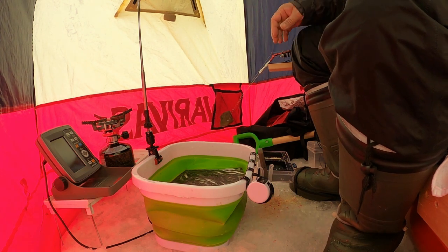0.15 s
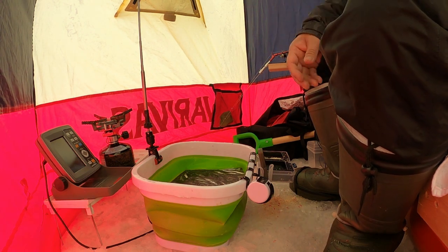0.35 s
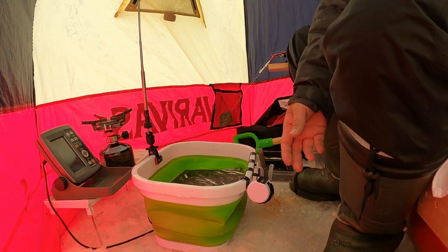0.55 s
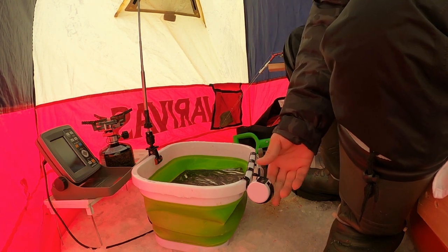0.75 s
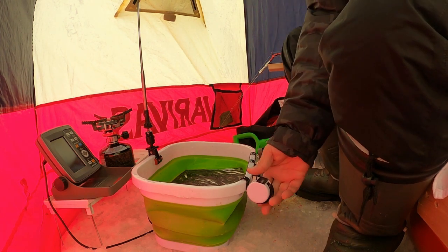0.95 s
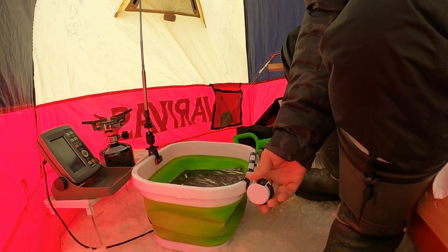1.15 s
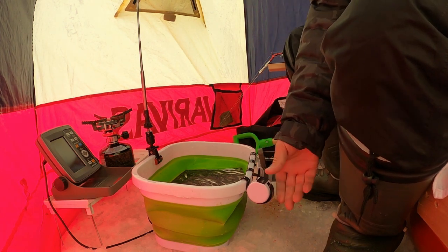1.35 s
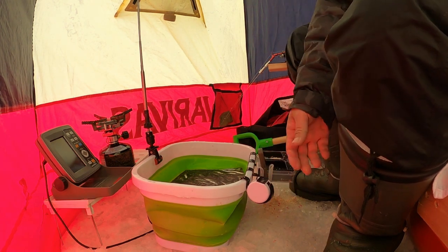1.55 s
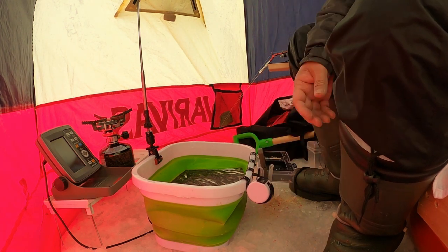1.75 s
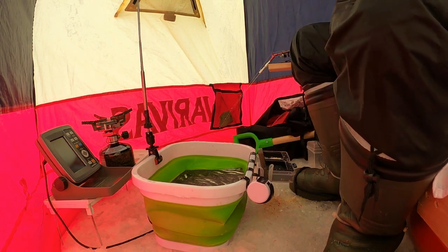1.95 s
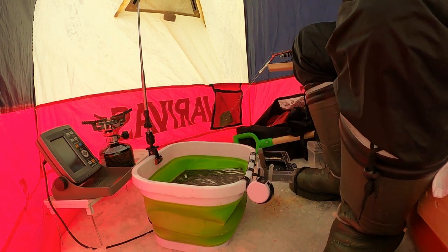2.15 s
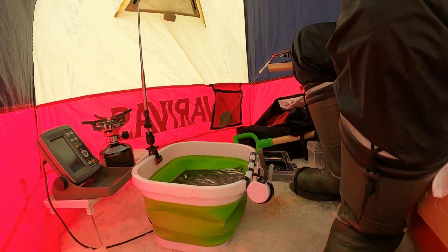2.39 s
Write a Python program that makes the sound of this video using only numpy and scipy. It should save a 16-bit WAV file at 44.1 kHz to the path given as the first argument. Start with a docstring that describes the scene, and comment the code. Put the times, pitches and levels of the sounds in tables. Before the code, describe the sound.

Nylon jacket swishes as someone leans, a seat creaks, and a small reel clicks twice

```python
"""Inside a tent on ice, an angler leans down to a small reel, clicks it twice and straightens up.
The nylon jacket swishes first, as grainy noise, and its weave zips once as a gliding tone. Soft bumps and
a rumble of filtered noise join in, and something under the shifting weight, probably the seat, creaks in
stick-slip knocks of ringing modes. The reel snaps on press and release and rings its case; then come a second
swish and a softer creak. A faint whir of throbbing noise lies underneath throughout."""
import sys
import numpy as np
from scipy import signal
from scipy.fft import rfft, irfft
from scipy.io import wavfile

SR = 44100
rng = np.random.default_rng(int(sys.argv[2]) if len(sys.argv) > 2 else 0)


def wrap_up_sound(samples):
    """Save the sound to the file named by the first command line argument, as 16-bit audio."""
    columns = np.atleast_2d(samples).T
    # keep every value between -1 and 1, then stretch to whole-number steps
    tamed = np.clip(columns, -1, 1)
    steps = np.round(tamed * 32767).astype(np.int16)
    wavfile.write(sys.argv[1], SR, steps)


N = 112455
T = np.arange(N) / SR


def amp(db):
    """Amplitude gain is ten to the power of decibels over twenty."""
    return 10 ** (np.asarray(db) / 20)


def unit(x):
    """Normalisation to an rms of 1."""
    return x / np.sqrt(np.mean(x ** 2) + 1e-20)


def blow(x):
    """Energy normalisation: a short sound gets the energy of rms 1 held for a fixed time."""
    held_s = 0.01
    return unit(x) * np.sqrt(held_s * SR / x.shape[-1])


def read(points, hz):
    """Interpolation of a spectrum along a logarithmic frequency axis."""
    f, value = np.transpose(points)
    return np.interp(np.log(hz + 1), np.log(f + 1), value)


def curve(rows, axis=1):
    """Linear interpolation of one column of a time table at every sample."""
    rows = np.array(rows)
    return np.interp(T, rows[:, 0], rows[:, axis])


def pan(db):
    """Interchannel level difference: left and right gains, positive towards the left."""
    return amp([[db / 2], [-db / 2]])


def add(mix, s, sound):
    """Superposition: mixes a sound in place at a time in seconds."""
    part = mix[..., max(round(s * SR), 0):][..., :sound.shape[-1]]
    part += sound[..., :part.shape[-1]]


def colour(white, spectrum, extra_db=0):
    """Spectral shaping and partial coherence: mid and side noises set the likeness of the channels."""
    # Likeness of the two channels: (frequency [Hz], correlation [-1 to 1])
    likeness = [(60, 0.96), (500, 0.73), (3100, 0.7), (6000, 0.33), (15000, 0.05)]
    hz = np.fft.rfftfreq(white.shape[-1], 1 / SR)
    a, b = rfft(white)
    alike = np.clip(read(likeness, hz), -1, 1)
    mid = a * np.sqrt(1 + alike)
    side = b * np.sqrt(1 - alike)
    shaped = np.array([mid + side, mid - side]) * amp(read(spectrum, hz) + extra_db)
    return unit(irfft(shaped, white.shape[-1]))


def noise(spectrum, size=N, extra_db=0):
    """Stereo Gaussian noise shaped to a spectrum."""
    return colour(rng.standard_normal((2, size)), spectrum, extra_db)


def wander(hz):
    """Random modulation: low-passed Gaussian noise of rms 1."""
    spectrum = rfft(rng.standard_normal(N))
    return unit(irfft(spectrum * (np.fft.rfftfreq(N, 1 / SR) < hz), N))


def fade(t, t60):
    """Exponential decay by 60 dB in the time t60."""
    return np.exp(-np.log(1000) * t / t60)


def mode(t, hz, swell_s, t60):
    """Resonant mode: a sine that swells, then decays exponentially."""
    swell = np.sin(np.pi / 2 * np.minimum(t / swell_s, 1))
    return np.sin(2 * np.pi * hz * t) * swell * fade(np.maximum(t - swell_s, 0), t60)


def creak():
    """Stick-slip friction: each slip cracks and rings the same body, never at quite the same pitch."""
    # Slips of the creak: (time [s], level [dB])
    slips = [(.5615, -37), (0.576, -35.5), (.593, -33), (0.6115, -32.5), (0.624, -32), (0.64, -33.5),
             (.659, -32.5), (0.6767, -33), (0.6986, -32), (0.72, -30.5), (0.753, -32), (0.7881, -30.5),
             (0.8292, -30), (0.8669, -30.5), (.9072, -30.5), (0.928, -31.5), (0.942, -33), (0.9613, -33),
             (.9795, -36), (1.0087, -32.5), (2.033, -38.5), (2.057, -44), (2.063, -42), (2.081, -41),
             (2.101, -40), (2.123, -41), (2.145, -40.5), (2.173, -43), (2.199, -40.5), (2.2195, -40),
             (2.233, -41), (2.249, -43), (2.266, -43.5), (2.2913, -38)]
    # Modes of the creaking thing, probably a seat:
    # (mean frequency [Hz], mean level on the hardest slip [relative dB], swell [s], t60 [s])
    seat_modes = [(105.5, -8.5, 0.0048, 0.067), (182.5, -7.5, 0.0044, 0.23), (290, -11, 0.0056, 0.051),
                  (416.4, -5.5, 0.0074, 0.054), (588, -6.5, .007, 0.05), (948.6, 0.5, 0.0048, 0.042),
                  (1240, -2.5, 0.0017, 0.023), (1899, -2, 0.0043, 0.023), (2780, -0.5, 0.0025, 0.031),
                  (3326, -6, 0.0018, .016), (4160, -4, 0.0013, .014), (4700, 0.5, .001, 0.019)]
    # Dry crack of a slip: (frequency [Hz], spectral density [relative dB])
    crack_spectrum = [(100, -26), (750, -3), (1000, -4.5), (1500, -1.5), (2400, -11), (4800, -6.5),
                      (5600, -12), (12000, -60)]
    crack_db, crack_t60_s = -6.5, 0.064  # level relative to the ring
    # softer slips ring duller: dB lost at dull_hz for each dB below the hardest
    dulling, dull_hz = 0.15, 4500
    vary_db, detune = 1.5, 0.022  # standard deviations of mode level and relative pitch
    out, t = np.zeros((2, N)), np.arange(SR // 5) / SR
    same = rng.standard_normal((2, len(t)))  # the part that all cracks share
    hardest = max(db for s, db in slips)
    for s, db in slips:
        ring, dull_db = 0, dulling * (db - hardest)
        for k, (hz, mode_db, swell_s, t60) in enumerate(seat_modes):
            louder, higher = rng.standard_normal(2)
            gain = amp(mode_db + dull_db * (hz / dull_hz) ** 2 + vary_db * louder)
            # neighbouring modes start with opposite signs
            ring = ring + (-1) ** k * gain * mode(t, hz * (1 + detune * higher), swell_s, t60)
        crack = colour(same + rng.standard_normal(same.shape), crack_spectrum) * fade(t, crack_t60_s)
        add(out, s, amp(db) * (blow(ring) + amp(crack_db) * blow(crack)))
    return out * pan(-0.4)


def reel():
    """Impact excitation: plastic snaps ring the case, low and hollow on press, bright on release."""
    # Clicks of the reel: (time [s], level of the snap [dB], centre of the snap [Hz],
    # level of the case's ring [dB], 0 press or 1 release)
    clicks = [(1.1886, -36, 6000, -56, 0), (1.1902, -25, 2770, -24.5, 0), (1.2401, -47.5, 1500, -46, 0),
              (1.2912, -53, 1700, -51.5, 0), (1.3087, -43.5, 4300, -42.5, 1),
              (1.342, -30.5, 4800, -35.5, 1), (1.347, -38.5, 5960, -42, 1)]
    # Snap of a click, ahead of its focus: (frequency [Hz], spectral density [relative dB])
    snap_spectrum = [(100, -28), (750, -18.5), (1050, 0), (1900, 1), (2450, -9.5), (3000, 0.5), (4800, 1.5),
                     (8500, -6.5), (10000, -11.5), (13000, -16.5), (15500, -40)]
    # Modes of the case: (frequency [Hz], level on the press [relative dB],
    # level on the release [relative dB], t60 [s])
    case_modes = [(991, -1, -2, 0.027), (1288, -7.5, -14, 0.023), (1990, -6.5, -13, 0.021),
                  (3046, -8.5, -4, 0.03), (4727, -4, -1, 0.032), (5580, -24, -5, 0.043),
                  (7100, -6, -8, 0.05)]
    rise_s, snap_t60_s = 0.0013, 0.027
    tail_db, tail_t60_s = -15, 0.088  # weaker, slower second decay
    focus_boost_db, focus_octaves = 5, 0.33  # each snap is lifted around its centre
    press_swell_cycles, release_swell_cycles = 7, 2
    out, t = np.zeros((2, N)), np.arange(SR // 5) / SR
    bins = np.fft.rfftfreq(len(t), 1 / SR) + 1
    decay = fade(t, snap_t60_s) + amp(tail_db) * fade(t, tail_t60_s)
    shape = np.minimum(t / rise_s, 1) * decay
    for s, snap_db, centre_hz, ring_db, released in clicks:
        swell_cycles = release_swell_cycles if released > .5 else press_swell_cycles
        ring = 0
        for hz, press_db, release_db, t60 in case_modes:
            gain = amp(release_db if released > .5 else press_db)
            ring = ring + gain * mode(t, hz, swell_cycles / hz, t60)
        focus_db = focus_boost_db * np.exp(-(np.log2(bins / centre_hz) / focus_octaves) ** 2)
        snap = blow(noise(snap_spectrum, size=len(t), extra_db=focus_db) * shape)
        add(out, s, amp(snap_db) * snap + amp(ring_db) * blow(ring))
    return out * pan(1)


def jacket():
    """Textile friction: nylon on nylon makes dense tiny catches in a fluttering hiss, and one short zip."""
    # Swish of the jacket: (time [s], mean level of the treble [dB], mean level of the mids [dB])
    swish_levels = [(0, -65.5, -72.5), (.125, -63.5, -60.5), (.17, -44, -60), (.225, -38, -51.5),
                    (.4, -37, -50.5), (.55, -35, -41), (.7, -37.5, -42.5), (.85, -41.5, -43.5),
                    (.97, -48, -49.5), (1.17, -51, -51.5), (1.28, -61.5, -55), (1.41, -58, -56.5),
                    (1.5, -45.5, -45), (1.62, -41.5, -45), (2.06, -39.5, -45), (2.17, -42, -46.5),
                    (2.28, -50.5, -55.5), (2.4, -50.5, -64), (2.55, -50.5, -52.5)]
    # Treble part of the swish: (frequency [Hz], spectral density [relative dB])
    treble_spectrum = [(100, -74), (1200, -12), (2400, -3), (3400, 1), (5500, -1), (7700, -2), (9000, -8),
                       (10000, -15), (12000, -16.5), (15000, -31)]
    # Middle part of the swish: (frequency [Hz], spectral density [relative dB])
    mids_spectrum = [(60, -24), (400, -10.5), (780, -10), (1050, -1), (1400, 2.5), (1900, -2.5), (2250, 4),
                     (2700, -5), (6000, -28)]
    # Zip of the weave as the sleeve speeds up: (time [s], mean pitch [Hz], mean level [dB])
    zip_track = [(.24, 1515, -48), (.277, 1405, -53), (.302, 1485, -42), (.32, 1540, -51),
                 (.353, 1685, -42.5), (.37, 1790, -64)]
    catches_per_s, catch_db, catch_share = 3000, 0.5, 0.22  # share is of the noise power
    flutter_db, flutter_hz = -0.76, 58.4  # rms depth (the sign is immaterial), highest rate
    zip_jitter, zip_flutter_db = 0.016, 2.5  # rms of relative pitch and of level

    strength = amp(catch_db * np.minimum(rng.exponential(1, N), 4))
    catches = (rng.random(N) < catches_per_s / SR) * strength
    grip = np.sqrt(1 - catch_share + catch_share * unit(catches) ** 2)
    flutter = flutter_db * wander(flutter_hz)
    treble = colour(grip * rng.standard_normal((2, N)), treble_spectrum)
    treble = treble * amp(curve(swish_levels, axis=1) + flutter)
    mids = colour(grip * rng.standard_normal((2, N)), mids_spectrum)
    mids = mids * amp(curve(swish_levels, axis=2) + flutter)

    turns = np.cumsum(curve(zip_track) * (1 + zip_jitter * wander(200))) / SR
    weave = np.sqrt(2) * np.sin(2 * np.pi * turns)
    weave = weave * amp(curve(zip_track, axis=2) + zip_flutter_db * wander(90))
    weave = weave * (T > zip_track[0][0]) * (T < zip_track[-1][0])
    return treble * pan(2.5) + (mids + weave) * pan(0.98)


def body():
    """Low-frequency impact and rumble: band-limited noise swells and bumps as the weight shifts."""
    # Rumble of the moving body: (time [s], level [dB])
    rumble_levels = [(0, -66.5), (.45, -55.5), (.54, -50), (.58, -42.5), (.72, -46), (.97, -48),
                     (1.12, -65.5), (1.25, -54), (1.42, -67), (1.7, -57.5), (1.9, -61), (2.05, -49.5),
                     (2.37, -56.5), (2.46, -63)]
    # Colour of the rumble: (frequency [Hz], spectral density [relative dB])
    rumble_spectrum = [(28, -30), (45, -4.5), (120, -4.5), (175, 3.5), (240, -6), (800, -12), (2000, -59)]
    # Soft bumps of boots and knees: (time [s], length [s], relative level [dB], centre [Hz])
    soft_bumps = [(0.218, 0.085, -52, 159), (.552, 0.095, -42.5, 95), (.64, 0.09, -43.5, 85.5),
                  (1.562, 0.092, -50, 190), (1.948, 0.077, -49, 99), (2.34, 0.022, -48.5, 171)]
    step_octaves = 0.53  # spacing of the points across a bump's spectral hump
    out = noise(rumble_spectrum) * amp(curve(rumble_levels))
    for s, length, db, hz in soft_bumps:
        hump = [(hz * 2 ** (k * step_octaves), -5 * k * k) for k in range(-4, 5)]
        window = np.hanning(int(length * SR))
        bump = unit(noise(hump)[:, :len(window)] * window)
        add(out, s, amp(db) * bump * 0.67)
    return out


def whir():
    """Amplitude modulation: a faint band of noise throbs sinusoidally in the background."""
    # Whir: (frequency [Hz], spectral density [relative dB])
    whir_spectrum = [(800, -31), (1000, 2), (1285, 13), (2200, -20)]
    carrier_db, throb_hz, depth = -62, 34.3, 0.37
    throb = 1 + depth * np.sin(2 * np.pi * throb_hz * T)
    return amp(carrier_db) * noise(whir_spectrum) * throb


def tent(x):
    """Diffuse reflection: convolution with a short noise tail for the cloth walls and the ice."""
    t60_s, first_s = 0.083, 0.004  # decay time, delay of the first reflection
    t = np.arange(SR // 5) / SR
    tail = noise([(100, -10.5), (15000, 5.0)], size=len(t)) * fade(t, t60_s) * (t > first_s)
    return signal.fftconvolve(x, tail / np.linalg.norm(tail[0]), axes=1)[:, :N]


def scene():
    """Superposition of all sources; only the creak and the reel excite the tent's reflections."""
    knocks = creak() + reel()
    return knocks + amp(-7) * tent(knocks) + jacket() + body() + whir()


def record(dry):
    """Linear filtering: a hollow in the low mids, a slight lag on the left, then a band limit."""
    dip_hz, dip_width_hz, dip_db = 760, 100, -6
    left_lag_s, edge_hz = 0.00005, 15600
    hz = np.fft.rfftfreq(N, 1 / SR)
    spectrum = rfft(dry) * amp(dip_db * np.exp(-((hz - dip_hz) / dip_width_hz) ** 2))
    spectrum[0] *= np.exp(-2j * np.pi * hz * left_lag_s)  # a delay is a linear phase
    low_pass = signal.firwin(401, edge_hz, window=("kaiser", 9), fs=SR)
    return signal.oaconvolve(irfft(spectrum, N), low_pass[None], "same")


dry = scene()
out = record(dry)
wrap_up_sound(out)
```